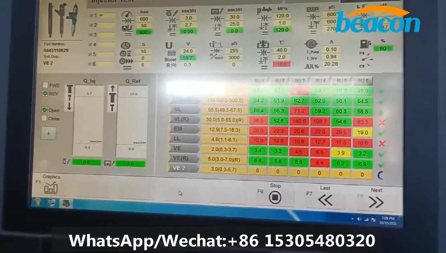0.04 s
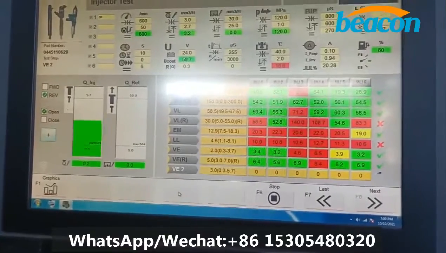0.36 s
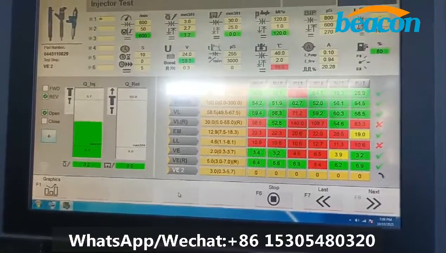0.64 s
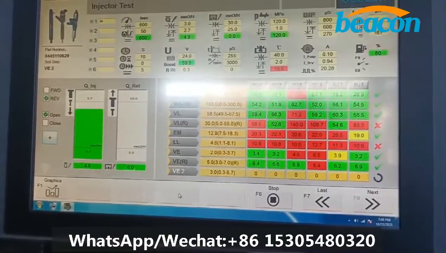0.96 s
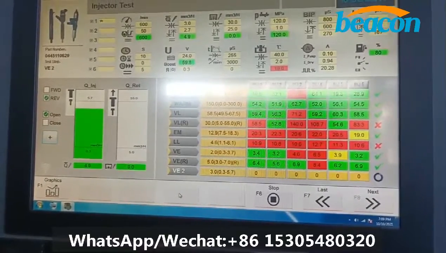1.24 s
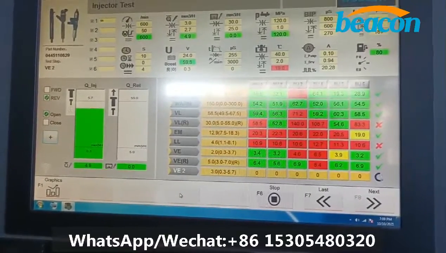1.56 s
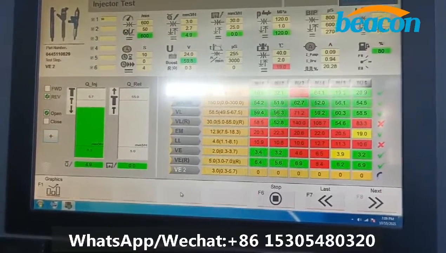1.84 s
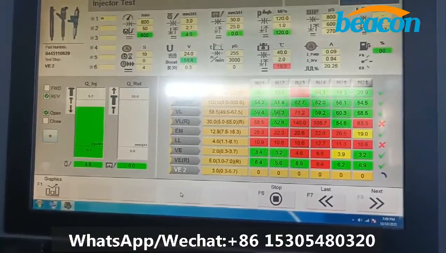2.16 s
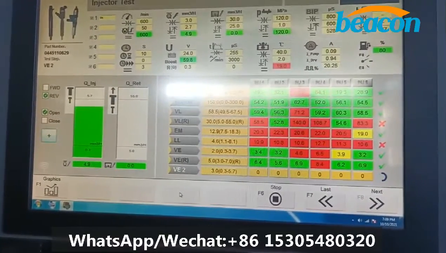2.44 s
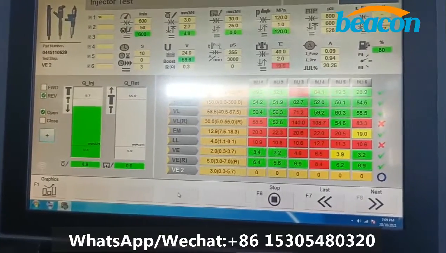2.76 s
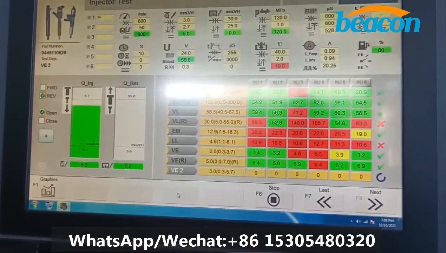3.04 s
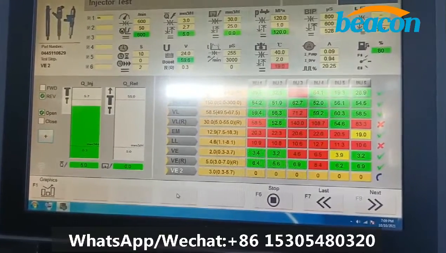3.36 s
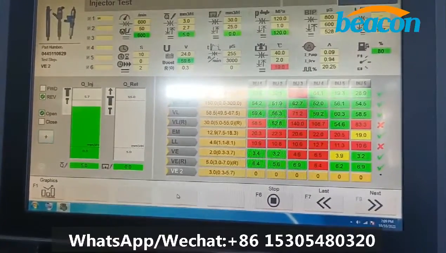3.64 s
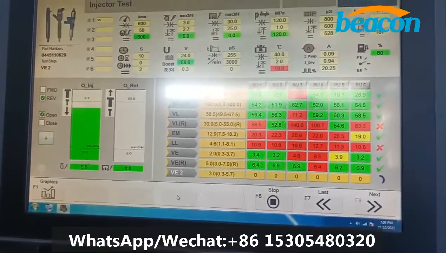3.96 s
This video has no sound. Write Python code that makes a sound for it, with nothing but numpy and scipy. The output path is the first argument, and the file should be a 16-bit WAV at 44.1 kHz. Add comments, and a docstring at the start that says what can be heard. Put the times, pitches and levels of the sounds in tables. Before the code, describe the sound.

A diesel injector test bench runs steadily in a workshop, its high-pressure pump making a hard, rapid buzz. Beneath it a motor hums with uneven throbs, panels rumble and fuel hisses, heard from a hand-held microphone.

```python
"""A diesel injector test bench in a workshop, heard at the two microphones of a hand-held camera.
From the start the high-pressure pump knocks through the same cycle fifty times a second: a hard buzz
of sharp orders, different at each microphone. Under it the drive hums, the cabinet panels rumble and
the fuel flow hisses. The low hum throbs unevenly until about 3.3 s; just after, the rumble swells
and falls back while the pump runs on."""
import sys
import numpy as np
from scipy import signal
from scipy.fft import rfft, irfft
from scipy.io import wavfile
from scipy.ndimage import map_coordinates

SR = 44100
rng = np.random.default_rng(int(sys.argv[2]) if len(sys.argv) > 2 else 0)


def unload_wav(signal):
    """Save mono or channel-first audio to the path in sys.argv[1] as 16-bit WAV at rate SR, clipped to [-1, 1]."""
    wavfile.write(
        sys.argv[1],
        SR,
        np.round(np.clip(np.atleast_2d(signal).T, -1, 1) * 32767).astype(np.int16),
    )


N = 176400
CYCLE_HZ = 50.013
# likeness of the sound at the two microphones: f/Hz, likeness/0-1
MIC_LIKENESS = [(130, 1), (200, .99), (320, 0.9), (500, 0.4), (700, 0.25), (15000, .02)]


def pump(size=4096, poses=14):
    """The pump cycle repeats; its orders waver as the camera sways, the high ones most."""
    orders, lines = pump_cycle()
    t = np.arange(N) / SR
    pose, place = np.linspace(0, poses - 1, N), t * CYCLE_HZ % 1 * size
    sway = .093 + .018 * orders * CYCLE_HZ / 1000
    out = []
    for mic in lines:
        real, imag = rng.standard_normal((2, poses, len(orders)))
        swayed = mic * (1 + sway * (real + 1j * imag))
        cycles = irfft(np.pad(swayed, ((0, 0), (1, 0))), size) * size / np.sqrt(2)
        out.append(map_coordinates(cycles, [pose, place], order=1, mode="grid-wrap"))
    return np.array(out)


def pump_cycle(size=512, count=309, turns=80, drone_hz=698.4, ring_hz=(1900, 5500), band_hz=420):
    """Orders of one cycle: a run of knocks, coloured by the bench on the way to each microphone."""
    orders = np.arange(1, count + 1)
    hz = orders * CYCLE_HZ
    gain, apart = bench_colour(hz)
    centres = np.arange(*ring_hz, band_hz / 2)[:, None]
    bands = np.exp(-((hz - centres) / band_hz) ** 2)
    force = knock_force(centres, size)
    droning = (hz > drone_hz) & (hz <= ring_hz[0])
    ringing = (hz > ring_hz[0]) & (hz < ring_hz[1])  # higher orders just sizzle
    lines = gain * np.exp(1j * np.pi * rng.uniform(-1, 1, gain.shape) * np.where(ringing, .5, 1))
    for turn in range(turns):  # knock rhythm and bench colour are imposed in turn
        ring = np.fft.ifft(lines[:, None] * bands, size)
        ring += ring.sum(0) * np.exp(-2 * turn / turns)
        knocked = (np.fft.fft(force * flatten(ring))[..., :count] * bands).sum(1)
        drone = np.fft.ifft(lines * droning, size)
        drone += 2 * drone.sum(0)
        even = np.fft.fft(flatten(drone))[:, :count]
        shaped = np.where(ringing, knocked, np.where(droning, even, lines))
        lines = gain * np.exp(1j * np.angle(shaped))
        if turn > turns / 4:  # hold the phase gap between the microphones
            lead = apart * np.sign(np.angle(lines[0] * lines[1].conj()))
            pair = gain * np.exp(.5j * np.array([lead, -lead]))
            lines = pair * np.exp(1j * np.angle((lines * pair.conj()).sum(0)))
    return orders, lines


def knock_force(centres, size, width_cycles=.04, log_spread=.17, sweep_s_per_hz=1.5e-6):
    """How hard each band rings through the cycle; the low end of each knock arrives later."""
    # ringing knocks, then bright ticks: place/cycles, left weight/dB, right weight/dB, f/Hz
    knocks = [(-.005, 4, 3, 2480), (.06, -20, -8, 2270), (.13, -12, -16, 3100), (.26, -9, -9, 2550),
              (.35, -5, 0, 2620), (.51, -4, 0, 2600), (.645, -1, -4, 2450), (.75, -6, -2, 2620),
              (.85, -16, -6, 2900), (.92, -5, 0, 2680), (.01, -18, -9, 4800), (.36, -18, -9, 4200),
              (.66, -20, -11, 5100), (.73, -22, -10, 3800), (.82, -18, -5, 4800), (.94, -18, -7, 4000)]
    place = np.arange(size) / size
    force = amp(-24)  # ringing that lasts between knocks
    for at, left_db, right_db, hz in knocks:
        late = (place - at + sweep_s_per_hz * CYCLE_HZ * (centres - hz) + .5) % 1 - .5
        shape = np.exp(-(late / width_cycles) ** 2 - (np.log(centres / hz) / log_spread) ** 2)
        force = np.hypot(force, amp([left_db, right_db])[:, None, None] * shape)
    return force


def bench_colour(hz, scatter_db=2.2, max_apart_rad=2.68):
    """The bench radiates each order with a gain at each microphone and a phase gap between them."""
    # strongly radiated orders: order, left level/dB, right level/dB, likeness/-1 to 1
    strong_orders = [(6, -35.0, -34.0, 1.0), (10, -46.0, -40.0, 0.1), (11, -38.0, -39.0, 0.7),
                     (12, -46.0, -47.0, 0.8), (16, -48.0, -42.0, -0.8), (17, -39.0, -39.0, -0.9),
                     (18, -40.0, -39.0, -0.1), (19, -32.0, -29.0, -0.1), (21, -40.0, -38.0, 0.8),
                     (22, -35.0, -42.0, 0.9), (23, -40.0, -34.0, -0.7), (30, -51.0, -43.0, 0.0),
                     (40, -43.0, -42.0, -0.9), (41, -51.0, -38.0, 0.3), (42, -31.0, -29.0, -0.8),
                     (43, -54.0, -38.0, -0.3), (44, -52.0, -39.0, -0.2), (45, -33.0, -38.0, 1.0),
                     (46, -36.0, -37.0, 0.3), (47, -31.0, -32.0, 0.7), (48, -42.0, -36.0, -0.8),
                     (49, -41.0, -25.0, 0.2), (50, -31.0, -39.0, 0.3), (51, -33.0, -26.0, -0.1),
                     (52, -37.0, -41.0, -0.1), (53, -35.0, -35.0, 1.0), (54, -31.0, -29.0, -0.1),
                     (55, -44.0, -39.0, -0.7), (56, -38.0, -33.0, -0.7), (57, -46.0, -35.0, -0.7),
                     (58, -42.0, -37.0, -0.5), (61, -49.0, -32.0, 0.6), (62, -35.0, -29.0, 0.3),
                     (69, -48.0, -39.0, -0.8), (74, -48.0, -36.0, 0.9), (77, -47.0, -39.0, 0.9),
                     (79, -46.0, -39.0, 0.9), (88, -55.0, -35.0, 0.6), (89, -45.0, -36.0, 0.9),
                     (94, -54.0, -38.0, 0.9), (105, -49.0, -34.0, 0.9), (106, -66.0, -37.0, -0.0)]
    # trend of all other orders: f/Hz, left level/dB, right level/dB
    buzz_levels = [(147, -51, -47.5), (600, -55.5, -55), (1070, -52, -56), (1350, -70, -66.5),
                   (1760, -61, -64), (2350, -49, -60), (3000, -44, -46), (3450, -46, -43), (3780, -48, -49),
                   (3950, -43, -42), (4300, -52, -42), (4550, -52, -45), (4900, -53, -41.5),
                   (5150, -53, -47), (5400, -57, -45), (5756, -61, -52.5), (6570, -59, -57),
                   (7570, -50, -55), (9510, -57, -59), (12640, -65, -62.5), (15000, -72, -71)]
    db = both(buzz_levels, hz) + scatter_db * rng.standard_normal((2, len(hz)))
    apart = max_apart_rad * rng.random(len(hz))
    for order, left_db, right_db, likeness in strong_orders:
        db[:, order - 1] = left_db, right_db
        apart[order - 1] = np.arccos(likeness)
    return amp(db), apart


def drive(waver_depth=.24):
    """The motor and its drive hum in low, wavering tones."""
    # hum tones: f/Hz, level before wavering/dB
    tones = [(98.3, -38), (147.4, -40), (196.5, -49), (260, -41), (280, -41.5), (290, -42), (296, -43.5),
             (310, -44), (335, -45.5), (360, -49.5), (538, -49.5), (684, -44), (722, -48)]
    t, out = np.arange(N) / SR, np.zeros((2, N))
    for hz, db in tones:
        waver = 1 + waver_depth * (drift(N, count=16) + 1j * drift(N, count=16))
        start = 2 * np.pi * rng.random()
        apart = np.arccos(read(MIC_LIKENESS, hz)) * rng.choice([-1, 1])
        phase = 2 * np.pi * hz * t + start + np.array([[0], [apart]])
        out += np.sqrt(2) * amp(db) * (waver * np.exp(1j * phase)).real
    return out


def throb(hz=94.6, half_width_s=.021):
    """The low hum swells in short, uneven throbs, alike at both microphones."""
    # throbs: t/s, peak level/dB
    peaks = [(.08, -28), (.26, -19), (.52, -22), (1.5, -22), (1.74, -25), (2.07, -19.5), (2.35, -19.5),
             (2.64, -19.5), (3.0, -18.5), (3.075, -22), (3.16, -20), (3.29, -24)]
    t, out = np.arange(N) / SR, np.zeros(N)
    for at, db in peaks:
        envelope = amp(db) * np.exp(-((t - at) / half_width_s) ** 2)
        out += envelope * np.cos(2 * np.pi * (hz * t + rng.random()))
    return out


def cabinet(split_hz=65):
    """Broad panel resonances rumble; the deep and upper parts swell separately."""
    # panel rumble before the swells: f/Hz, density/(dB per Hz)
    panel_spectrum = [(10, -66), (28, -59.5), (42, -48), (58, -50.5), (78, -50), (94, -47), (106, -47.5),
                      (118, -54), (180, -58), (235, -56), (300, -57.5), (345, -56.5), (420, -62.5),
                      (700, -73.5)]
    # swell of the deep part: t/s, gain/dB
    deep_swell = [(0, 1), (.4, -13), (.7, -4.5), (1.8, -5), (2.25, -0.5), (2.5, -2.5), (3.3, -2), (3.62, 4),
                  (4, -9)]
    # swell of the upper part: t/s, gain/dB
    upper_swell = [(0, -0.5), (1.1, -1), (1.6, -1), (2.8, -2), (3.45, 3.5), (3.7, -1.5), (4, -1)]
    hz, t = np.fft.rfftfreq(N, 1 / SR), np.arange(N) / SR
    rumble = noise(read(panel_spectrum, hz) - 100 * (hz > panel_spectrum[-1][0]))
    deep = irfft(rfft(rumble) / (1 + (hz / split_hz) ** 8), N)
    deep_gain = amp(np.interp(t, *np.transpose(deep_swell)))
    upper_gain = amp(np.interp(t, *np.transpose(upper_swell)))
    return (rumble - deep) * upper_gain + deep * deep_gain


def fuel_flow(ripple_hz=55):
    """The fuel hisses steadily; nearby reflections ripple its spectrum, more so in the treble."""
    # hiss before the ripple: f/Hz, left density/(dB per Hz), right density/(dB per Hz)
    hiss_spectrum = [(20, -95, -95), (430, -69, -67), (536, -59, -59.5), (640, -60, -63), (800, -68, -66),
                     (1030, -65, -63), (1300, -69.5, -67.5), (1620, -72.5, -70.5), (1820, -72, -69.5),
                     (2050, -66, -63), (3000, -66.5, -63.5), (4200, -71.5, -67.5), (5100, -73, -67.5),
                     (6000, -78, -69), (7400, -73, -67), (9500, -73, -72), (12000, -82, -81),
                     (15000, -91, -91)]
    hz = np.fft.rfftfreq(N, 1 / SR)
    ripple = np.interp(hz / ripple_hz, np.arange(SR), rng.standard_normal(SR))
    depth_db = .6 + .22 * hz / 1000
    return noise(both(hiss_spectrum, hz) + depth_db * ripple)


def noise(db_per_hz):
    """Stereo noise of a given density, alike at both microphones in the bass."""
    alike = read(MIC_LIKENESS, np.fft.rfftfreq(N, 1 / SR))
    left, unrelated = rfft(rng.standard_normal((2, N)))
    right = alike * left + np.sqrt(1 - alike ** 2) * unrelated
    return irfft(np.array([left, right]) * amp(db_per_hz), N) * np.sqrt(SR / 2)


def flatten(pair):
    """A complex stereo wave with its joint envelope divided out."""
    return pair / np.sqrt((abs(pair) ** 2).sum(0))


def drift(size, count):
    """A smooth curve of unit spread through count random points."""
    curve = signal.resample(rng.standard_normal(count), size)
    return curve / curve.std()


def amp(db):
    """Decibels to gain."""
    return 10 ** (np.asarray(db) / 20)


def read(points, hz, column=1):
    """One column of a table, joined by straight lines over log frequency."""
    table = np.array(points, float)
    return np.interp(np.log(hz + 1), np.log(table[:, 0] + 1), table[:, column])


def both(points, hz):
    """The left and right columns of a table."""
    return np.array([read(points, hz, column=c) for c in (1, 2)])


def scene():
    """The whole bench, as it reaches the two microphones."""
    return pump() + drive() + cabinet() + throb() + fuel_flow()


def record(dry):
    """The recorder cuts the treble above 15.2 kHz."""
    lowpass = signal.firwin(511, 15200, window=("kaiser", 9), fs=SR)
    return signal.oaconvolve(dry, lowpass[None], "same")


dry = scene()
out = record(dry)
unload_wav(out)
```